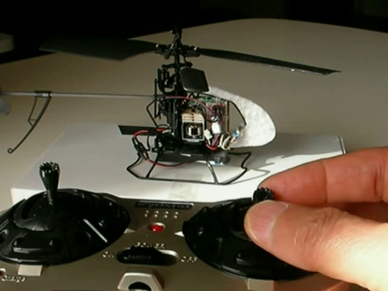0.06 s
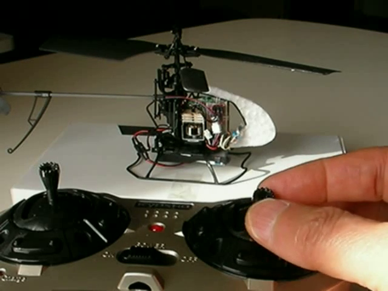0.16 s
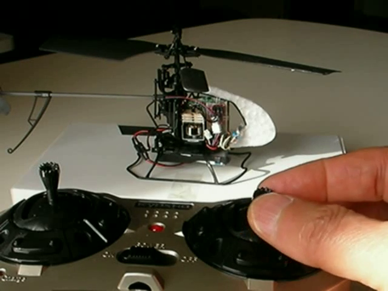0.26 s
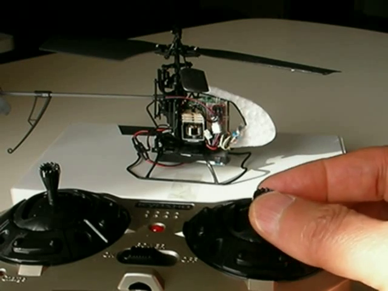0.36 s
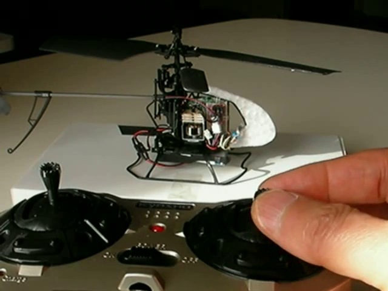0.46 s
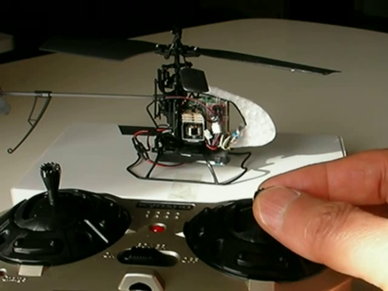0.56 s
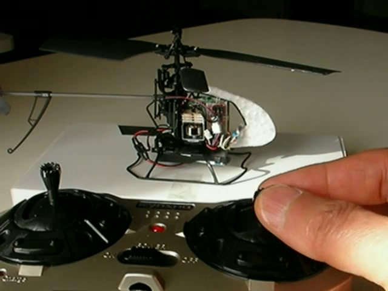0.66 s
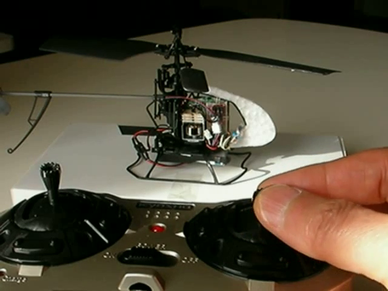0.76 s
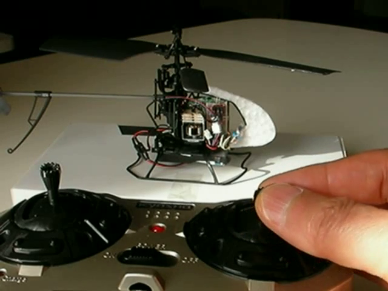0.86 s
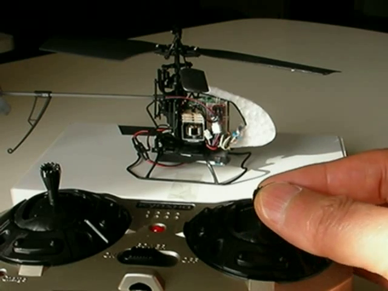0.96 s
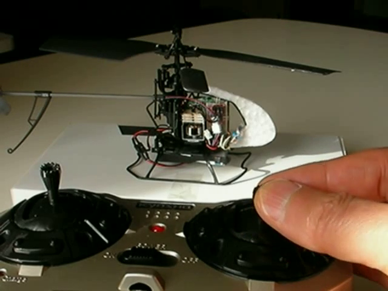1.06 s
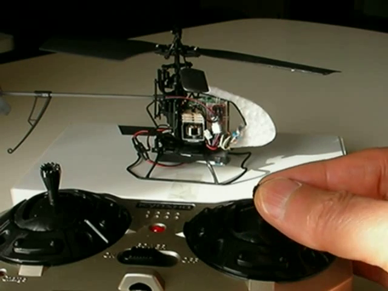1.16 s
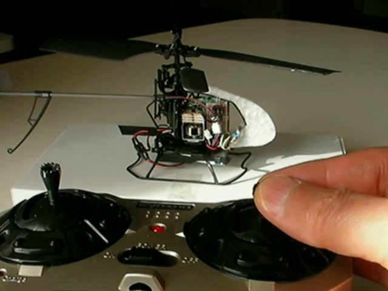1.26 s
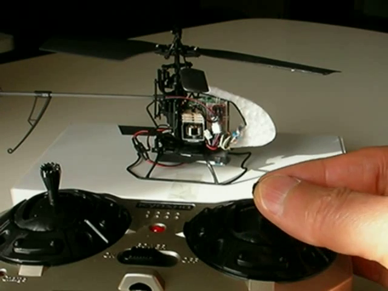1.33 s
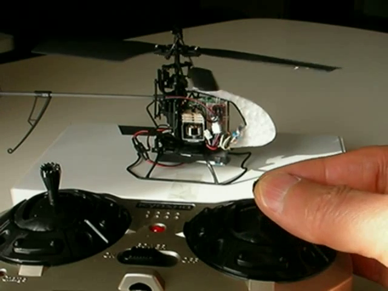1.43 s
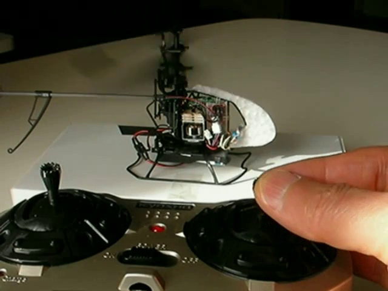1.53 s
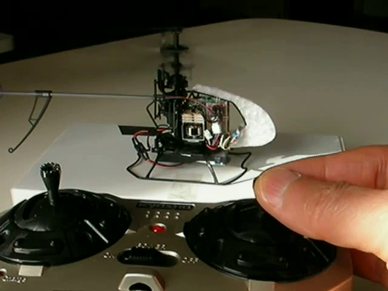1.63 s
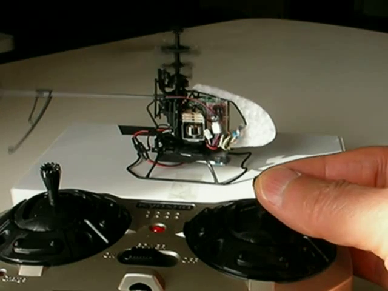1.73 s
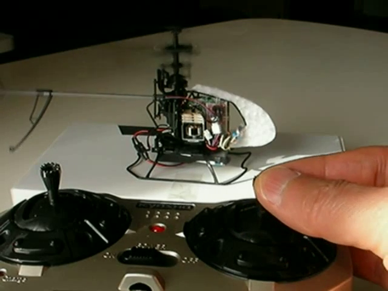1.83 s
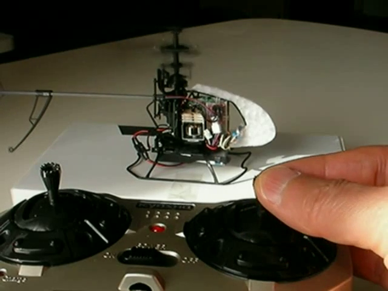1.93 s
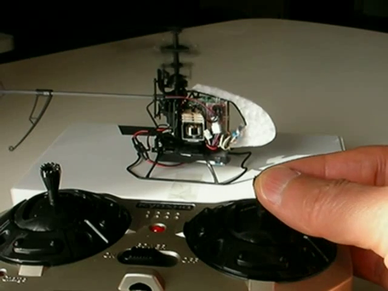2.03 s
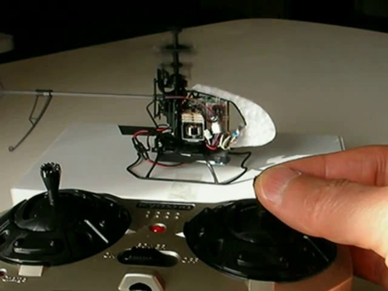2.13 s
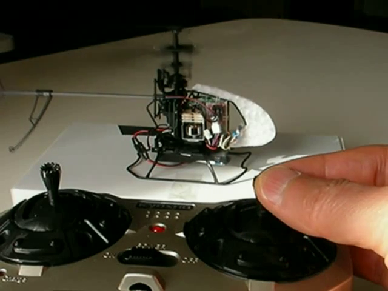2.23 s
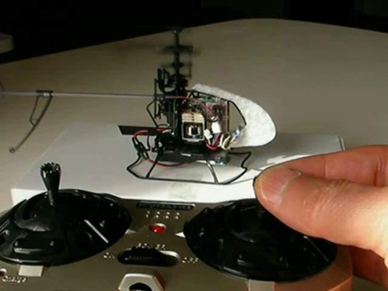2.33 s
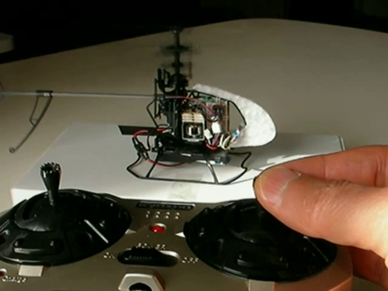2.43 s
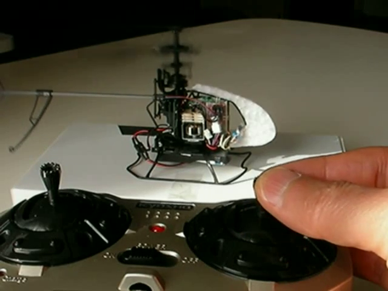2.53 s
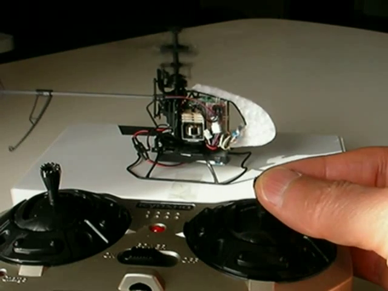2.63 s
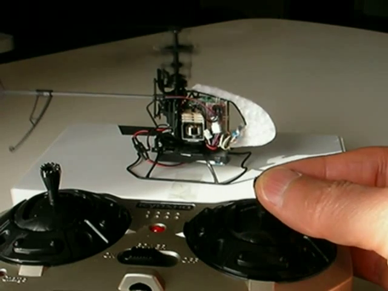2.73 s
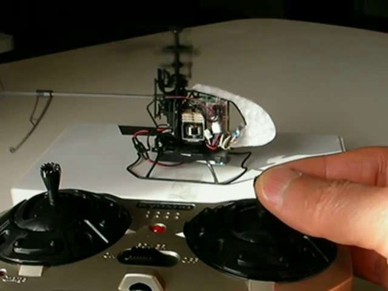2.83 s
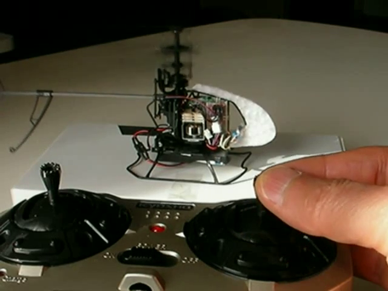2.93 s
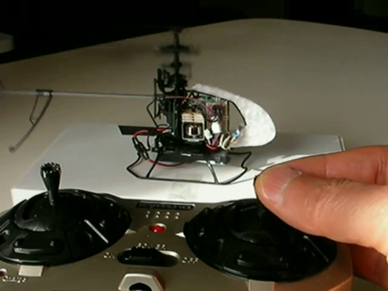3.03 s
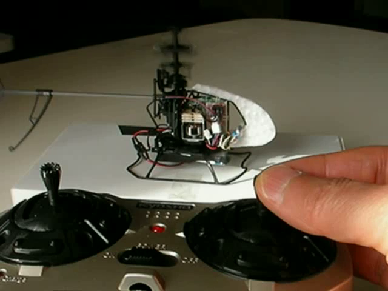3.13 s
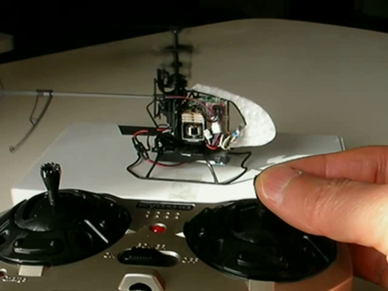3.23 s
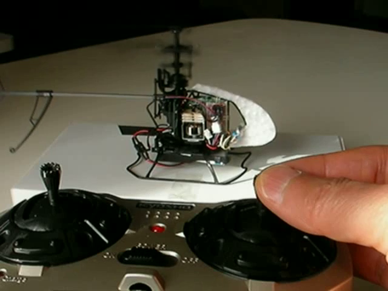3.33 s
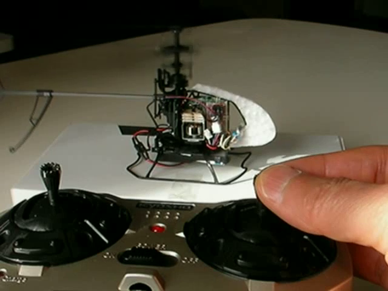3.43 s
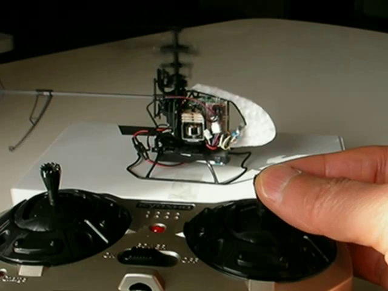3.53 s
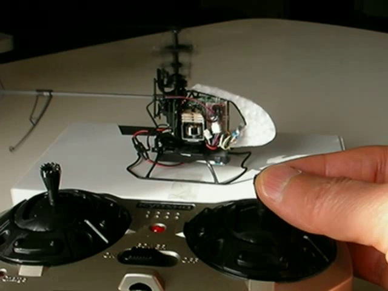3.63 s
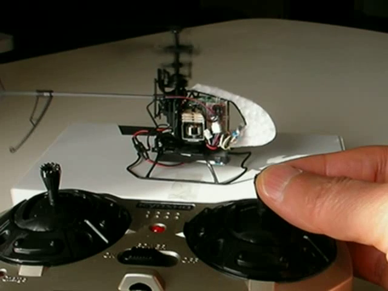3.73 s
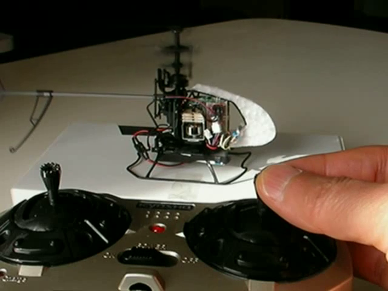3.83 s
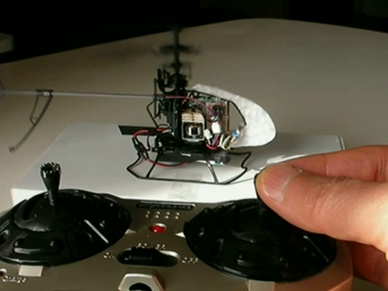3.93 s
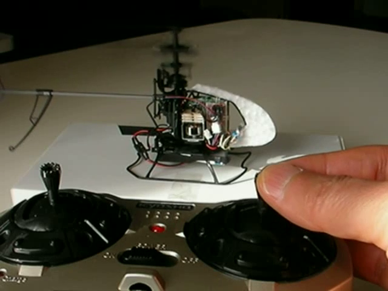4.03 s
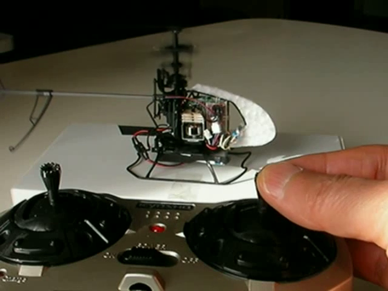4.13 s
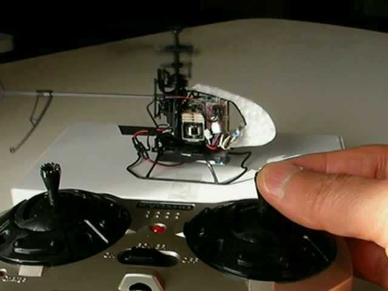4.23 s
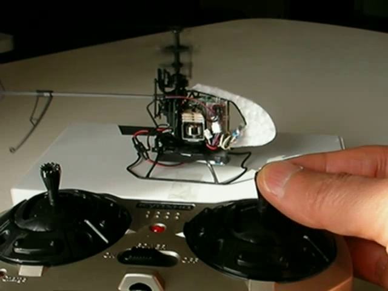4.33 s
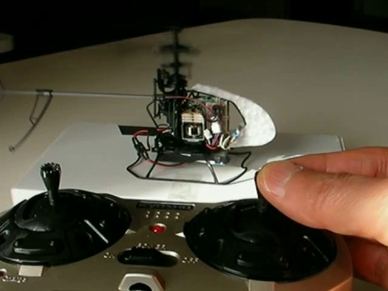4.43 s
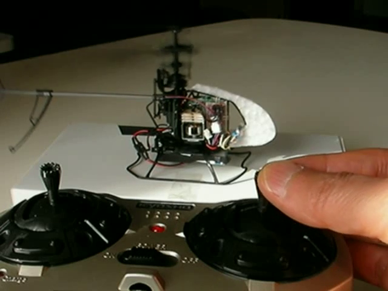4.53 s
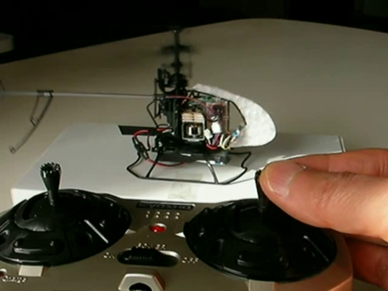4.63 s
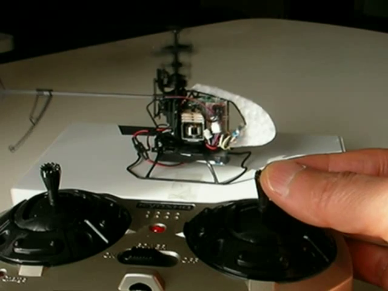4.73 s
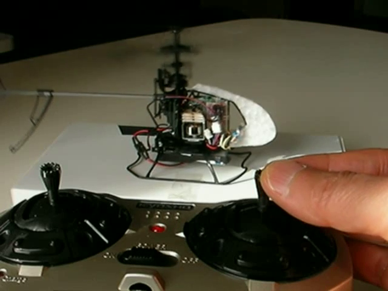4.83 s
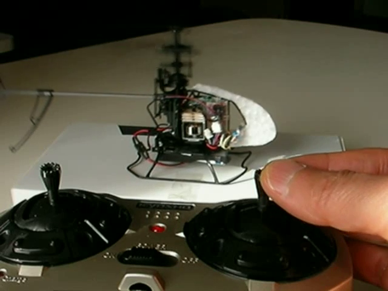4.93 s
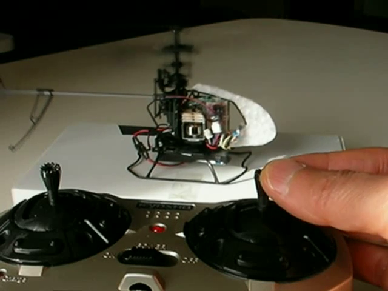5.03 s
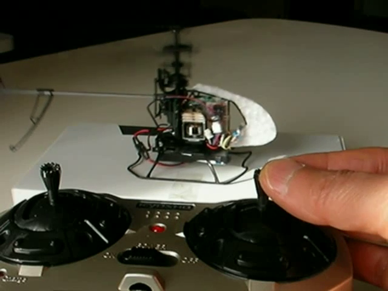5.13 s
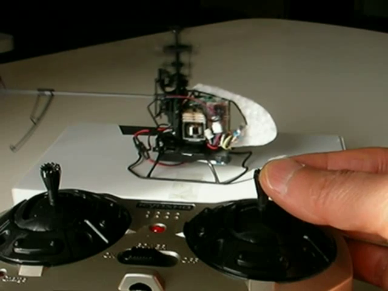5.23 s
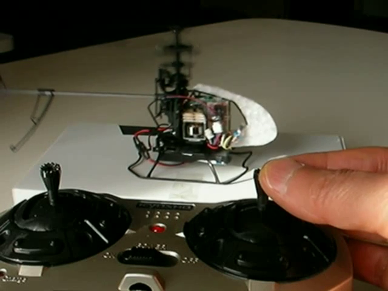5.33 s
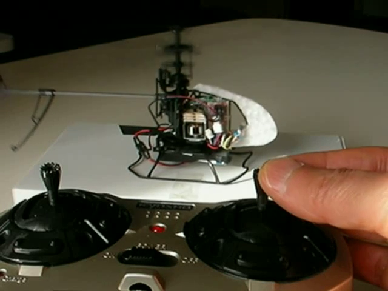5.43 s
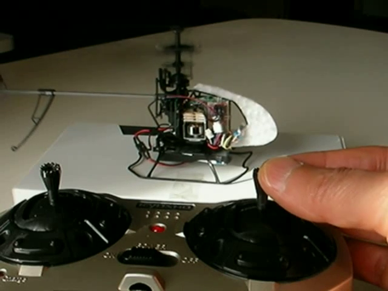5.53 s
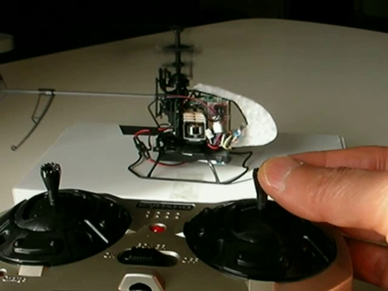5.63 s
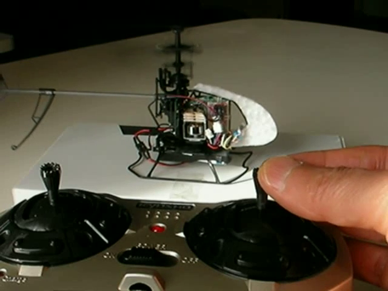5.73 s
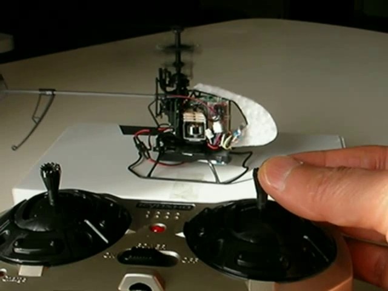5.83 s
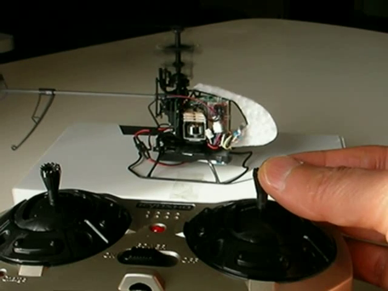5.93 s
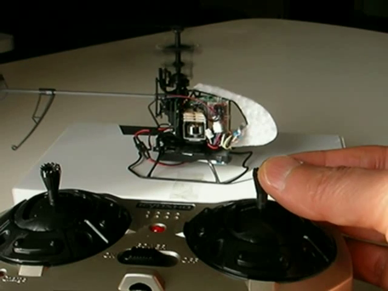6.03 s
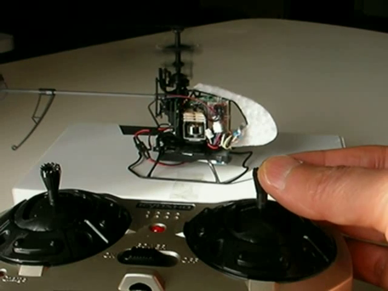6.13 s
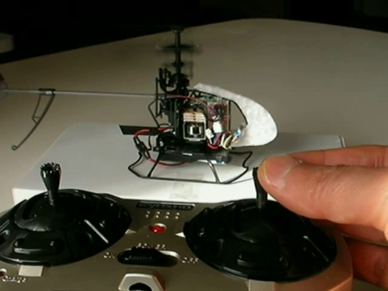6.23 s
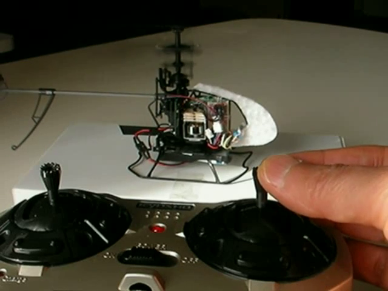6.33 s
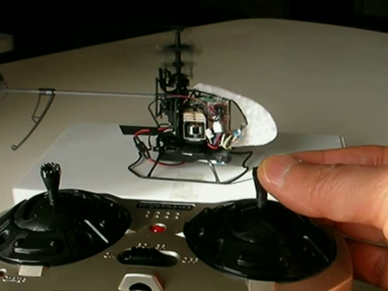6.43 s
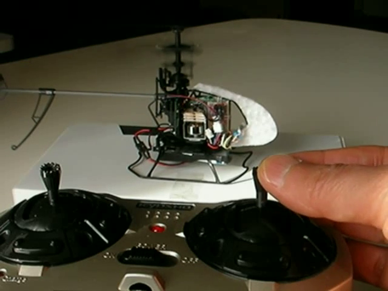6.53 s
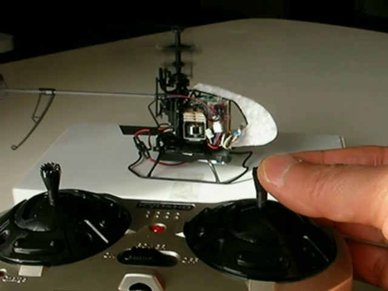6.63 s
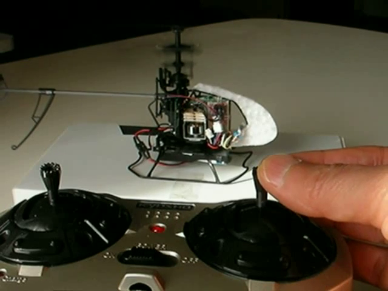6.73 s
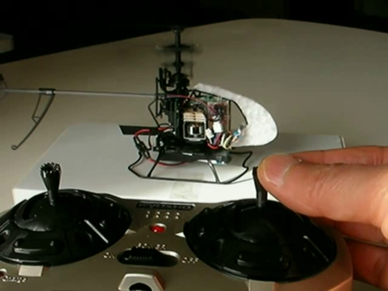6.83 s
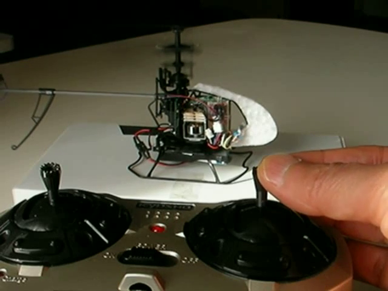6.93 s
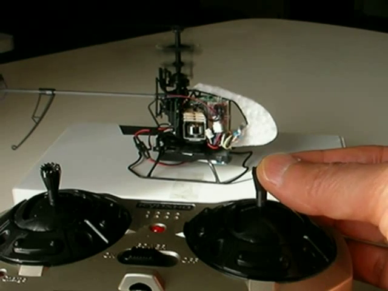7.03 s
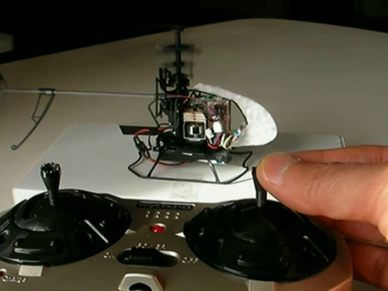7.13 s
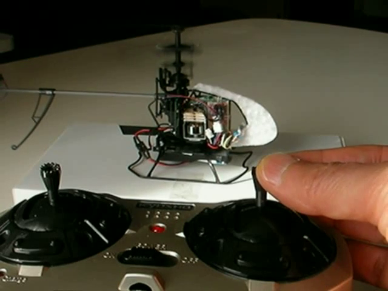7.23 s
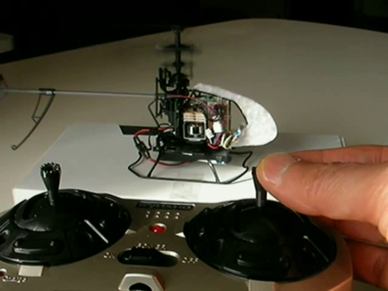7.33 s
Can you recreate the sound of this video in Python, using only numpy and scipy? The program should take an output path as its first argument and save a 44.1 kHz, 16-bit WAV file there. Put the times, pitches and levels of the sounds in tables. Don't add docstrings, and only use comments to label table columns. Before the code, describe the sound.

Close, boxy recording of a model helicopter on a table. Quiet hiss gives way to clicks, electronic beeps and rapid knocks, then the rotor breaks free and gear noise sweeps upward within a second. A buzzing whine holds with bright metallic chatter and a faint tail hum, rises by about half over two seconds, then stays there, still running, with wind-like bumps moving between left and right.

```python
import sys
import numpy as np
from scipy import signal
from scipy.fft import rfft, irfft, next_fast_len
from scipy.io import wavfile
from scipy.ndimage import uniform_filter1d, minimum_filter1d

SR = 44100
rng = np.random.default_rng(int(sys.argv[2]) if len(sys.argv) > 2 else 0)


def field_ratio(decibels):
    return 10 ** (np.asarray(decibels, dtype=float) / 20)


def pcm_store(signal):
    levels = np.round(np.clip(np.atleast_2d(signal), -1, 1) * 32767)
    wavfile.write(sys.argv[1], SR, levels.astype(np.int16).T)


N = 325017

# time in seconds, tooth mesh rate in Hz.
THROTTLE = [(2.3, 2221), (2.65, 2246), (2.93, 2239), (3.36, 2252), (3.47, 2279), (3.68, 2244), (4.07, 2227),
            (4.27, 2242), (4.43, 2352), (4.73, 2484), (4.92, 2648), (5.15, 2746), (5.35, 2798),
            (5.63, 3014), (5.92, 3170), (6.22, 3212), (6.5, 3369), (7.37, 3360)]
# time in seconds, rattle level in dB, whine over rattle in dB.
GEAR_LOAD = [(1.46, -47, 0), (1.5, -39, 6), (1.6, -36, 0.5), (1.66, -32.5, 1.5), (1.69, -28, -2.5),
             (1.84, -23.5, -3), (2.12, -24, 2.5), (4.4, -23.5, 2), (4.75, -20.5, -1), (5.47, -21, 1.5),
             (7.37, -23, 7)]
# one pinion turn below, one above,
# one rotor turn below, one above, smear, all in dB.
TOOTH_SIDE_TONES = [(-18, -21, -17, -21, -13), (-10, -7.5, 3, 1, -12), (-2.5, 0, -4.5, -11.5, -12),
                    (-2, -1, -2, -6, -11.5), (-3.5, -3, -2.5, -2, -14), (-4, -10, -8.5, -9.5, -7),
                    (-7.5, -17, -11, -6, -18)]
# frequency in Hz, gain in dB.
FRAME_RINGING = [(1200, -56), (2500, -40.5), (4480, -33.5), (6350, -32.5), (6800, -42.5), (7300, -31.5),
                 (8400, -33.5), (9300, -39), (10100, -29.5), (11200, -28.5), (12500, -29.5), (13400, -31.5),
                 (14400, -28.5), (15500, -20)]
# frequency in Hz, density in dB per Hz.
RATTLE_SPECTRUM = [(150, -30), (300, -46), (700, -32.5), (1480, -29), (2180, -18), (3300, -14), (5000, -10),
                   (8000, -5), (11000, -0.5), (13200, 1), (14500, -6.5), (16000, -10)]
# mesh rate in Hz, gain in dB.
MOUNT_RINGS = [(1200, -2), (2030, 3.5), (2275, 0.5), (2340, -14.5), (2540, 4), (2800, 3.5), (3100, -5.5),
               (3360, 0)]
# mesh rate in Hz, run-out from 0 to 1.
WHEEL_RUNOUT = [(300, 0.75), (2200, 0.31), (2750, 0.72), (3200, .5), (3360, 1)]
# mesh rate in Hz, depth from 0 to 1.
ROTOR_WOBBLE = [(2300, .1), (2800, .27), (3150, .34), (3350, .06)]
# multiple of the rotor turn, level in dB.
ROTOR_ORDERS = [
    (1, -61.5),
    (2, -55),
    (4, -75.5),
    (7, -65),
    (8, -75),
]
# frequency in Hz, gain in dB.
BENCH_BOOM = [(30, -2.5), (100, 0), (200, -3.5), (270, 10), (310, -2.5), (340, -5.5), (400, -15)]
# time in seconds, shaft rate in Hz, level in dB.
TAIL_MOTOR = [(1.6, 122, -80), (1.75, 165, -64), (1.95, 194.6, -63), (2.4, 196, -62.5), (3.3, 199.7, -61),
              (4.3, 202.3, -59), (4.98, 223.5, -55.5), (5.36, 230, -53), (5.56, 253.9, -53.5),
              (5.89, 268.7, -51.5), (6.39, 262.4, -53), (7.37, 261.4, -53)]
# multiple of the tail shaft rate, level in dB.
TAIL_ORDERS = [(2, -9), (3, -4), (4, 0.5), (6, 2.5), (8, 1.5), (10, 7.5)]
# time in seconds, level in dB.
WHISTLE_LEVEL = [
    (1.382, -47),
    (1.39, -28.5),
    (1.44, -30.5),
    (1.46, -25),
    (2.1, -26.5),
    (4.4, -29),
    (5.4, -29),
    (5.8, -35),
    (6.2, -63),
]
# start in seconds, length in seconds, level in dB.
SEEKING_KICKS = [
    (1.3245, .011, -31.5),
    (1.336, 0.013, -31),
    (1.35, .011, -37),
    (1.362, 0.02, -32),
]
SLACK_TICKS = {"winding": [(1.279, -45), (1.2995, -40), (1.311, -42), (1.346, -42)], "snap": [(1.2595, -28),
               (1.326, -40), (1.354, -38)], "knock": [(1.388, -37), (1.3985, -17), (1.4105, -15),
               (1.4195, -20), (1.427, -15), (1.434, -16)], "clink": [(1.4975, -20), (1.5025, -20.5)]}
TICK_RINGS = {"winding": [(0, 0, 4400, 450)], "snap": [(0, 0, 6800, 4500)], "knock": [(0, 0, 11000, 7000),
              (.0016, -22, 2200, 450)], "clink": [(0, 0, 7350, 500), (.001, -2, 8700, 500)]}
# centre in seconds, peak in dB, half length in seconds.
WASH_PUFFS = [(2.23, -32, .03), (2.33, -20, .04), (2.39, -22, .04), (2.52, -21, .025), (2.61, -35, .04),
              (2.77, -25, .025), (2.88, -35, .03), (3.1, -32, .05), (4.82, -36, .07), (5.72, -37, .03),
              (5.82, -28, .035), (6.47, -18, .035), (6.53, -17, .015), (6.58, -23, .04), (6.81, -17, .03)]
# frequency in Hz, gain in dB.
PORT_DIFFERENCE = [(60, -33), (110, -12.5), (200, 10), (380, -3), (700, -7.5), (1290, -8.5), (2380, -5),
                   (4400, -10), (8120, -12), (15000, -32)]
# frequency in Hz, density in dB per Hz.
COMMON_HISS = [(30, -7), (150, -18.5), (400, -27.5), (1000, -22), (4000, -21), (10000, -18), (16000, -18)]
# frequency in Hz, density in dB per Hz.
OPPOSED_HISS = [(30, 7.5), (240, -7), (500, -11), (1100, -15), (4000, -20), (8500, -22.5), (16000, -53)]


def evened(x):
    return x / np.sqrt(np.mean(x ** 2) + 1e-20)


def curves(rows):
    time_s, *columns = np.transpose(rows)
    return [np.interp(np.arange(N) / SR, time_s, c) for c in columns]


def read(points, hz):
    f, value = np.transpose(points)
    return np.interp(np.log(hz + 1), np.log(f + 1), value)


def coloured(x, points):
    size = next_fast_len(N)
    gain = field_ratio(read(points, np.fft.rfftfreq(size, 1 / SR)))
    return irfft(rfft(x, size) * gain, size)[:N]


def drift(hz):
    pole = np.exp(-2 * np.pi * hz / SR)
    return evened(signal.lfilter([1], [1, -2 * pole, pole ** 2], rng.standard_normal(N)))


def swell(rise_s, full_s, fall_s, gone_s, db):
    return field_ratio(db) * np.interp(np.arange(N) / SR, [rise_s, full_s, fall_s, gone_s], [0, 1, 1, 0]) ** 2


def mesh():
    start_s, aim_hz, lag_s, inertia_s, creep_hz = 1.4967, 2308, .1888, .06, 300
    t = np.arange(N) / SR
    closing_in = aim_hz * (1 - np.exp(-(t - start_s).clip(0) / lag_s))
    spin_hz = np.where(t < THROTTLE[0][0], closing_in, np.inf)
    throttle_hz = uniform_filter1d(curves(THROTTLE)[0], size=round(inertia_s * SR), mode="nearest")
    return np.maximum(np.minimum(spin_hz, throttle_hz), creep_hz)


def angles():
    rotor = 2 * np.pi * np.cumsum(mesh()) / SR / 70
    return rotor, 7 * rotor, 70 * rotor


def uneven(angle, depth_rad, count):
    steps = np.linspace(0, 2 * np.pi, 1024)
    shape = sum(np.sin(k * steps + 2 * np.pi * rng.random()) / np.sqrt(k) for k in range(2, count))
    return depth_rad * np.interp(angle % (2 * np.pi), steps, evened(shape))


def gears():
    mesh_hz = mesh()
    rotor, pinion, tooth = angles()
    level_db, whine_db = curves(GEAR_LOAD)
    tight_rad, loose_rad, loose_hz, loose_span_hz = 0.047, 0.25, 2290, 300
    looseness = np.exp(-((mesh_hz - loose_hz) / loose_span_hz) ** 2)
    scatter_rad = tight_rad + (loose_rad - tight_rad) * looseness
    timing = tooth + uneven(pinion, .09, count=6) + uneven(rotor, .07, count=30)
    by_pinion = np.exp(1j * pinion)
    by_rotor = -read(WHEEL_RUNOUT, mesh_hz) * np.exp(1j * rotor)
    throb = 1 + 0.15 * np.cos(rotor - .5)
    strike, carrier, whine = np.exp(1j * timing), 1, np.zeros(N)
    steps, clock = np.arange(N), tooth / tooth[-1] * N / 2.7
    for k, row in enumerate(TOOTH_SIDE_TONES, 1):
        pinion_low, pinion_high, rotor_low, rotor_high, smear = field_ratio(row)
        sides = 1 - pinion_low / by_pinion + pinion_high * by_pinion
        sides = sides * (1 - rotor_low * by_rotor.conj() + rotor_high * by_rotor)
        kept = np.exp(-(k * scatter_rad) ** 2 / 2)
        wheel_clock = clock * np.sqrt(k)
        fuzz = np.interp(wheel_clock, steps, drift(hz=210)) + 1j * np.interp(wheel_clock, steps, drift(hz=210))
        fuzz *= (smear + 0.37 * (1 - kept ** 2)) * throb
        carrier = carrier * strike
        tone = (kept * field_ratio(1.3 * drift(hz=12)) + fuzz) * sides * carrier
        if k == 1:
            tone *= field_ratio(read(MOUNT_RINGS, mesh_hz))
        if k == 2:
            tone *= field_ratio(np.interp(mesh_hz, [1510, 2010, 3380, 3410], [4.5, 0, -4, -4.5]))
        whine += np.sqrt(2) * tone.real * np.clip((19000 - k * mesh_hz) / 1500, 0, 1)
    wobble = 1 + read(ROTOR_WOBBLE, mesh_hz) * np.cos(rotor - .5)
    whine = coloured(whine * wobble * np.clip(mesh_hz / 600 - .6, 0, 1), FRAME_RINGING)
    bursts = throb * (1 + 0.2 * np.cos(pinion)) * (1 + 0.19 * np.cos(timing))
    rattle = evened(coloured(rng.standard_normal(N), RATTLE_SPECTRUM)) * bursts * field_ratio(0.5 * drift(hz=40))
    running = np.clip((np.arange(N) / SR - 1.43) / 0.017, 0, 1)
    return running * field_ratio(level_db) * (field_ratio(4.5) * rattle + field_ratio(whine_db + 24.5) * whine)


def whistle():
    switch_hz, sag_hz_per_khz, spin_sag_hz, handover_s = 8010, 10, 30, 2.07
    t = np.arange(N) / SR
    hz = switch_hz - sag_hz_per_khz * mesh() / 1000
    hz = hz - spin_sag_hz * (t < handover_s) * (t / handover_s) ** 6
    level = (t > WHISTLE_LEVEL[0][0]) * field_ratio(curves(WHISTLE_LEVEL)[0])
    for start_s, length_s, db in SEEKING_KICKS:
        arch = np.sin(np.pi * np.clip((t - start_s) / length_s, 0, 1) ** .7).clip(0)
        level += field_ratio(db - 1.5) * np.sqrt(arch) * (t < start_s + length_s)
    tone = np.sqrt(2) * np.sin(2 * np.pi * np.cumsum(hz) / SR + 0.28 * drift(hz=300))
    return level * field_ratio(0.58 * drift(hz=30)) * tone


def shafts():
    rotor, mesh_hz = angles()[0], mesh()
    tail_hz, tail_db = curves(TAIL_MOTOR)
    low = sum(field_ratio(db + 4.0 + 3.8 * drift(hz=4.9)) * np.sin(round(k) * rotor) for k, db in ROTOR_ORDERS)
    low = coloured(low * np.clip(mesh_hz / 2400 - .3, 0, 2) ** 0.65, BENCH_BOOM)
    turn = 2 * np.pi * np.cumsum(tail_hz * (1 + 0.00905 * drift(hz=24.65))) / SR
    odd_db = -.25 * np.maximum(262 - tail_hz, 0)
    hum = np.zeros(N)
    for k, db in TAIL_ORDERS:
        hum += field_ratio(db + round(k) % 2 * odd_db + 2.27 * drift(hz=14)) * np.sin(round(k) * turn)
    return low + (np.arange(N) > TAIL_MOTOR[0][0] * SR) * field_ratio(tail_db) * hum


def start():
    buzz = drift(hz=181) * np.sin(2 * np.pi * 4400 * np.arange(N) / SR) * field_ratio(2.1 * drift(hz=60))
    scrape_spectrum = [(800, -27), (2200, -9), (7000, 3), (12500, -4), (16000, -20)]  # Hz, dB
    scrape = evened(coloured(rng.standard_normal(N), scrape_spectrum))
    buzz_level = swell(1.23, 1.29, 1.54, 1.6, db=-54) + swell(1.36, 1.37, 1.386, 1.396, db=-49)
    return buzz_level * buzz + swell(1.38, 1.398, 1.437, 1.46, db=-41) * scrape


def ticks():
    out, t = np.zeros(N), np.arange(600) / SR
    for kind, rows in SLACK_TICKS.items():
        for (time_s, db), (fuzz, tune) in zip(rows, rng.standard_normal((len(rows), 2, 600))):
            for delay_s, part_db, hz, width_hz in TICK_RINGS[kind]:
                detune = 1 + .02 * tune[0] * width_hz / 1000
                ring = np.exp(-np.pi * width_hz * t) * np.sin(2 * np.pi * hz * detune * t)
                ring *= np.minimum(t * width_hz * 3, 1)
                ring += .1 * np.exp(-t / .001) * fuzz * (width_hz > 1000)
                out[round((time_s + delay_s) * SR):][:600] += field_ratio(db + part_db) * ring / abs(ring).max()
    return signal.sosfilt(signal.butter(4, 1600, "high", fs=SR, output="sos"), out)


def wash():
    t = np.arange(-8000, 8000) / SR
    breeze = evened(signal.sosfilt(signal.butter(6, 35, fs=SR, output="sos"), rng.standard_normal(N)))
    out = breeze * field_ratio(-43 + 3.5 * drift(hz=4.2)) * (mesh() / 3360) ** 1.8
    for (centre_s, db, half_s), noise in zip(WASH_PUFFS, rng.standard_normal((len(WASH_PUFFS), 16000))):
        top_hz = 105 * field_ratio(.35 * (db + 16.5)) * (0.033 / half_s) ** .9
        lumps = signal.sosfilt(signal.butter(6, 0.9 * top_hz, fs=SR, output="sos"), noise)
        heave = np.sqrt(2) * np.sin(2 * np.pi * .28 * top_hz * t + noise[0])
        puff = np.exp(-.5 * (t / half_s) ** 2) * (.6 * evened(lumps) + heave)
        out[round(centre_s * SR) - 8000:][:16000] += field_ratio(db - 2) * puff
    return out


def bench(x):
    taps = rng.choice([-1., 1.], 4000) * (rng.random(4000) < .08) * np.exp(-np.arange(4000) / SR / 0.03)
    return signal.oaconvolve(x, taps / np.linalg.norm(taps))[:N]


def hiss(spectrum, db):
    return field_ratio(db) * evened(coloured(rng.standard_normal(N), spectrum))


def camera():
    tone = np.sin(2 * np.pi * 15640 * np.arange(N) / SR)
    return field_ratio(-62 + 6.2 * drift(hz=8)) * drift(hz=70) * tone


def scene():
    machine = gears() + shafts() + whistle() + start() + ticks()
    mid = machine + hiss(COMMON_HISS, db=-54)
    side = coloured(0.0089 * machine + 1.17 * bench(machine), PORT_DIFFERENCE) + wash()
    side += hiss(OPPOSED_HISS, db=-49.5)
    return np.array([mid + side, mid - side])


def skips(x):
    top_band_hz, usual_share, raised_share, skip_db, quiet_db, gust_db = 13300, .04, .5, -16, -45, -25
    frames = N // 1024 + 1

    def frame_level(y):
        return np.pad(y, (0, frames * 1024 - N)).reshape(frames, -1).std(1)

    mid = frame_level(x.mean(0))
    bass = frame_level(uniform_filter1d(x[0] - x[1], size=200) / 2)
    share = np.where((mid < field_ratio(quiet_db)) | (bass > field_ratio(gust_db)), raised_share, usual_share)
    skipped = np.repeat(rng.random(frames) < share, 1024)[:N] * (1 - field_ratio(skip_db))
    high_pass = signal.firwin(401, top_band_hz, pass_zero=False, fs=SR)
    top = signal.oaconvolve(x, high_pass[None], "same")
    return x - uniform_filter1d(skipped, size=400) * top


def top_cut(x):
    return signal.sosfilt(signal.butter(12, 17080, fs=SR, output="sos"), x)


def record(dry):
    edge = signal.firwin(1601, 15740, window=("kaiser", 9), fs=SR)
    x = signal.oaconvolve(skips(dry) + camera(), edge[None], "same")
    room_left = minimum_filter1d(.94 / np.maximum(abs(x).max(0), .94), size=441)
    return top_cut(x * uniform_filter1d(room_left, size=221))


dry = scene()
out = record(dry)
pcm_store(out)
```